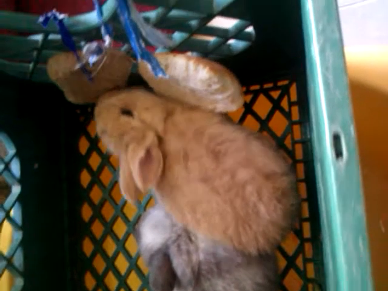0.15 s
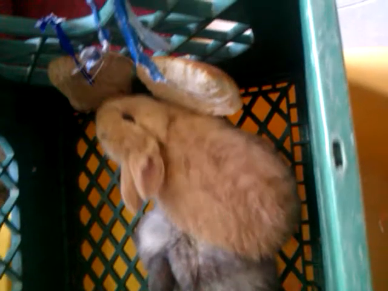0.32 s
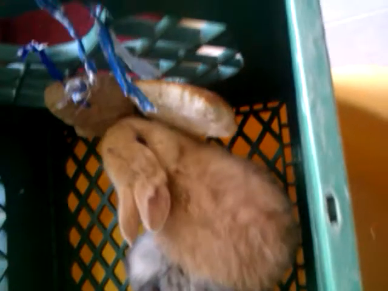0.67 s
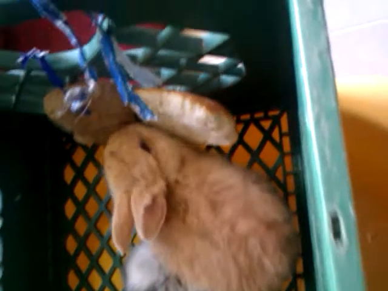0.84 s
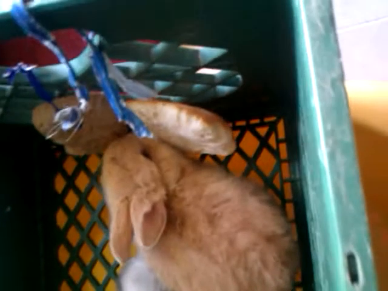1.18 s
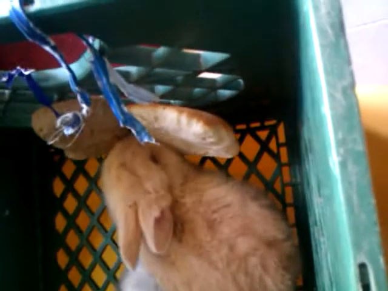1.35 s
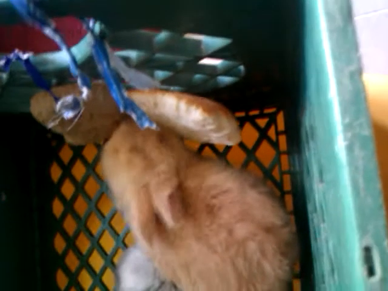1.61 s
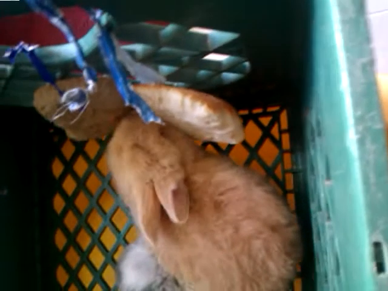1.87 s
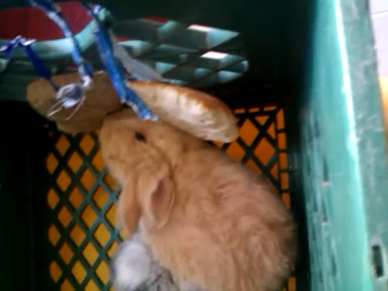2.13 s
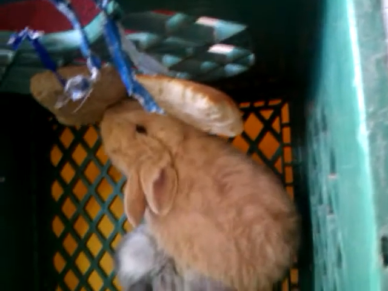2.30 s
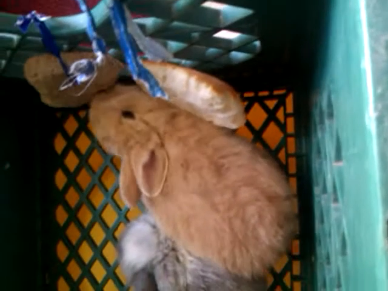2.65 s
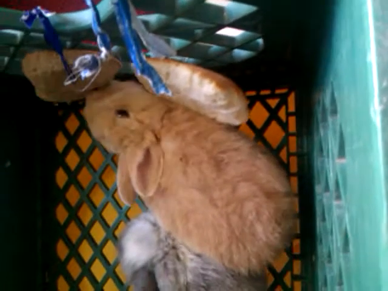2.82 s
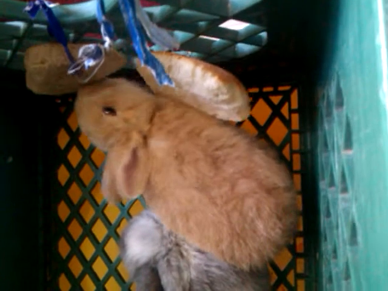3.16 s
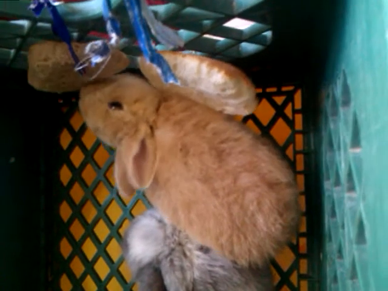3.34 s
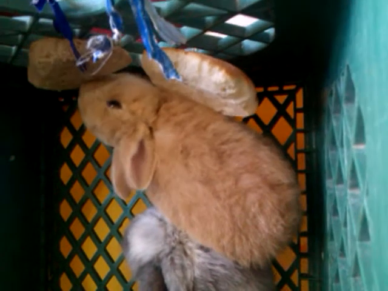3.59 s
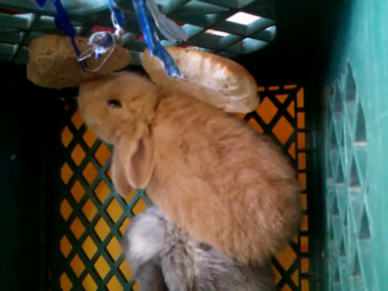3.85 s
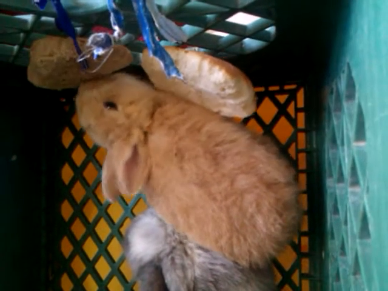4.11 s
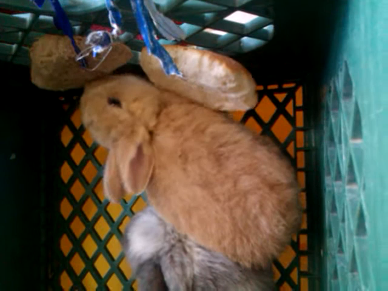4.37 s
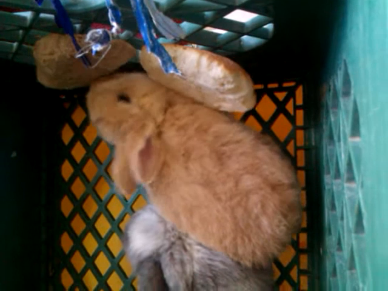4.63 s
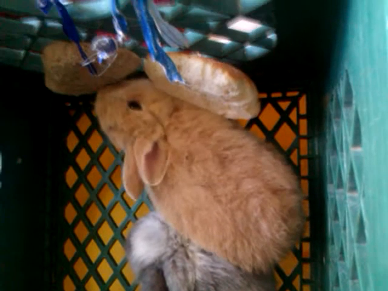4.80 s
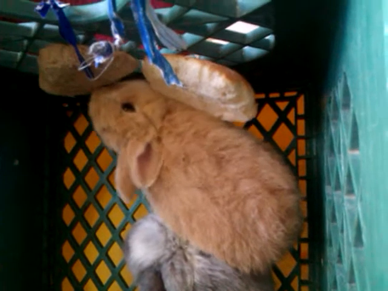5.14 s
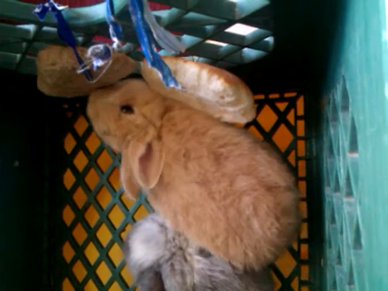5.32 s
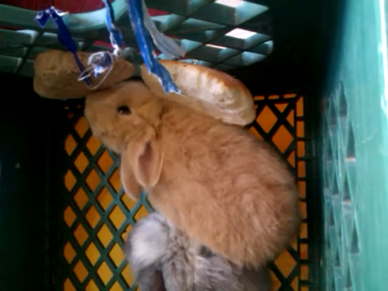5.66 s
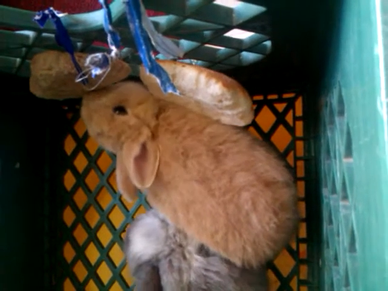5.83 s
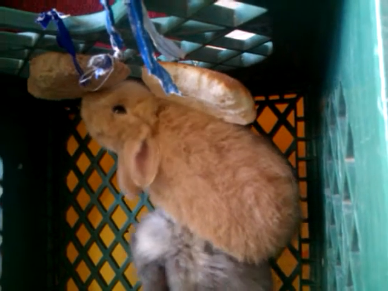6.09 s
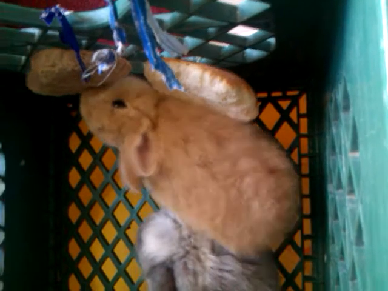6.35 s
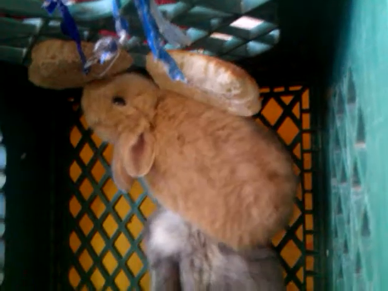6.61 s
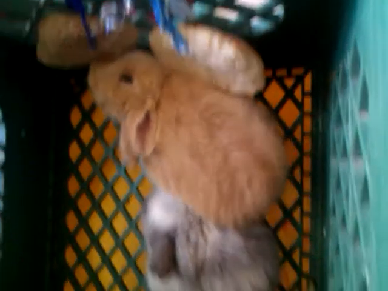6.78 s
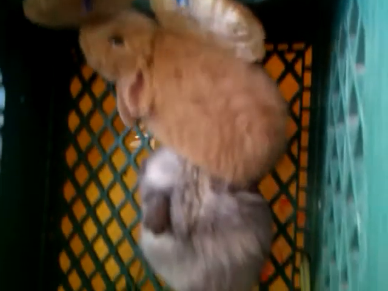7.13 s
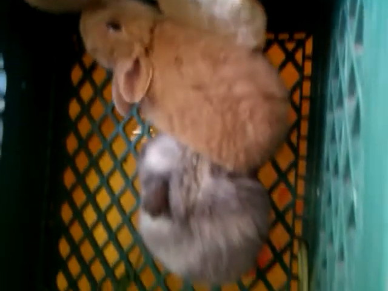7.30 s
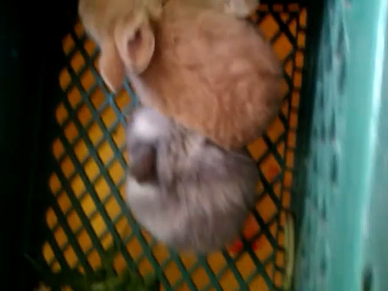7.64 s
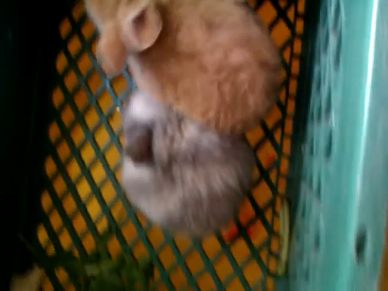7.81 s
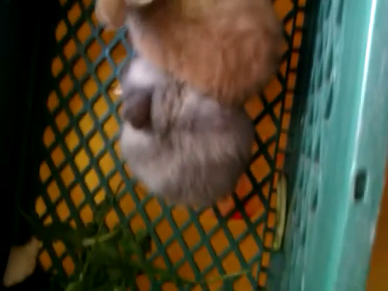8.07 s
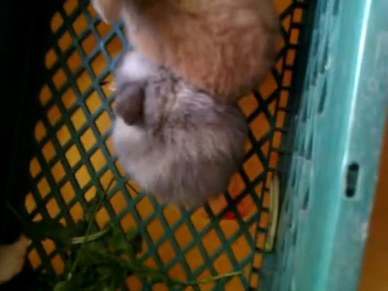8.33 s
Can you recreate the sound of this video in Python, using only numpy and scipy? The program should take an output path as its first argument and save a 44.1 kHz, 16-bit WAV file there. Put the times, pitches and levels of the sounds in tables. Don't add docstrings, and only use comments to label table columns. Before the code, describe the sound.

Sparse clicks and a distant metallic clank give way to dense crunching and scraping of hard bread, with hollow plastic knocks in a small room.

```python
import sys
import numpy as np
from scipy import signal
from scipy.fft import rfft, irfft
from scipy.io import wavfile
from scipy.ndimage import uniform_filter1d, map_coordinates

SR = 44100
rng = np.random.default_rng(int(sys.argv[2]) if len(sys.argv) > 2 else 0)


def to_linear_factor(level_db):
    exponent = np.asarray(level_db, float) / 20
    return 10 ** exponent


def wrap_up_sound(samples):
    columns = np.atleast_2d(samples).T
    tamed = np.clip(columns, -1, 1)
    steps = np.round(tamed * 32767).astype(np.int16)
    wavfile.write(sys.argv[1], SR, steps)


N = 373086


def unit(x):
    return x / np.sqrt(np.mean(x ** 2) + 1e-20)


def along(points, hz):
    f, v = np.transpose(points)
    return np.interp(np.log(hz + 1), np.log(f + 1), v)


def curves(rows):
    s, *cols = np.transpose(rows)
    return [np.interp(np.arange(N) / SR, s, c, -120, -120) for c in cols]


def wobble(rate):
    knots = rng.standard_normal(int(N * rate / SR) + 4)
    return map_coordinates(knots, [np.arange(N) * rate / SR])


def filtered(x, response):
    h = irfft(response(np.fft.rfftfreq(2 ** 15, 1 / SR)))
    return signal.oaconvolve(x, h / np.linalg.norm(h))[:len(x)]


def coloured(x, spectrum):
    def response(hz):
        c = irfft(np.log(to_linear_factor(along(spectrum, hz)) + 1e-6))
        c[1:len(c) // 2] *= 2
        c[len(c) // 2 + 1:] = 0
        return np.exp(rfft(c))
    return filtered(x, response)


def resonant(x, peaks):
    def response(f):
        total = 0
        for k, (c, w, db) in enumerate(peaks):
            total = total + (-1) ** k * to_linear_factor(db) * 1j * f * w / (c * c - f * f + 1j * f * w)
        return total
    return filtered(x, response)


def dulled(x, corner_hz):
    return filtered(x, lambda hz: 1 / (1 + 1j * hz / corner_hz) ** 4)


def bursts(times, levels_db, lives, rise=0.13):
    shape = np.zeros(N + SR)
    for s, db, life in zip(times, levels_db, lives):
        u = np.arange(round(8 * life * SR) + 2) / (SR * life)
        shape[round(s * SR):][:len(u)] += to_linear_factor(db - 9.84 * u) * (1 - np.exp(-u / rise))
    return shape[:N] * rng.standard_normal(N)


def blows(times, levels_db):
    return np.bincount(np.round(times * SR).astype(int), to_linear_factor(levels_db), N)


# pitch in Hz, time to fall 60 dB in seconds.
ROOM_DECAY = [(200, 0.41), (2000, 0.31), (6000, 0.34), (12000, 0.2)]


def room(x):
    out, step = np.zeros(N + 2 * SR), SR // 4
    for i in range(0, N, step):
        hz, t, z = signal.stft(rng.standard_normal(SR // 2), SR, nperseg=256)
        decay = to_linear_factor(-60 * t / along(ROOM_DECAY, hz)[:, None])
        tail = signal.istft(z * decay, SR, nperseg=256)[1]
        wet = signal.fftconvolve(x[i:i + step], tail / np.linalg.norm(tail))
        out[i:i + len(wet)] += wet
    return out[:N]


def lattice(x):
    low_hz, high_hz = 270, 4150
    return signal.sosfilt(signal.butter(4, [low_hz, high_hz], "band", fs=SR, output="sos"), x)


# pitch in Hz, level in dB per Hz.
AIR = [(53, -41), (90, -6.5), (145, -6), (273, -11.5), (370, -13.5), (711, -11), (865, -16.5), (1700, -17),
       (3190, -18.5), (4320, -18), (6830, -17.5), (11300, -24), (16300, -24.5)]
# pitch in Hz, level in dB per Hz.
HAND_RUMBLE = [(10, -32), (18, 7), (32, 6), (50, 2.5), (80, -3), (110, -15), (160, -34)]
# time in seconds, level in dB.
GRIP_SHIFTS = [(.12, -49.5), (.87, -58)]
# time in seconds, level in dB, pitch in Hz.
MOTOR = [(6.2, -101, 48.8), (6.66, -63, 48.7), (6.92, -67, 50), (7.1, -68, 49.1), (7.38, -65, 48.4),
         (7.54, -66, 48.4), (8.13, -59, 49.1), (8.46, -64, 49.2)]
# pitch in Hz, level in dB.
WHINE = [(11542, -87.5)]


def room_tone():
    t = np.arange(N) / SR
    air_db, rumble_db, shift_s = -60.5, -68.5, 0.075
    air = to_linear_factor(air_db + 0.83 * wobble(1.7)) * unit(coloured(rng.standard_normal(N), AIR))
    grip = sum(to_linear_factor(db) * np.exp(-((t - s) / shift_s) ** 2) for s, db in GRIP_SHIFTS)
    hand_level = grip + to_linear_factor(rumble_db + 2.0 * wobble(8.2))
    hand = hand_level * unit(coloured(rng.standard_normal(N), HAND_RUMBLE))
    motor_db, motor_hz = curves(MOTOR)
    motor_phase = 2 * np.pi * np.cumsum(motor_hz + 1.5 * wobble(5.7)) / SR
    motor = to_linear_factor(motor_db + 1.5 * wobble(8.3)) * np.sin(motor_phase)
    (whine_hz, whine_db), = WHINE
    whine = to_linear_factor(whine_db + 10.5) * np.sin(2 * np.pi * whine_hz * t)
    return air + hand + motor + whine


# pitch in Hz, level in dB per Hz.
BRIGHT = [(2470, -36.5), (4200, -11.5), (6180, -1.5), (9290, -17.5), (12400, -29.5), (15100, -26.5),
          (15800, -32), (16300, -43)]
# pitch in Hz, level in dB per Hz.
CRUNCH = [(700, -18), (1400, -8), (2000, -3.5), (2800, 0), (3600, -4), (4600, -8), (6000, -9), (9500, -70)]
# pitch in Hz, level in dB per Hz.
THUD = [(60, -56), (130, -17.5), (280, 3), (900, 5.5), (1500, -2.5), (2500, -53)]
# pitch in Hz, width in Hz, level in dB.
HOLLOW = [(291.3, 24, 6.5), (455, 74, -2)]
# pitch in Hz, width in Hz, level in dB.
WALLS = [(592.4, 31.6, 3.5), (898.6, 26, -1.5), (1485, 25, -8), (1638, 71, -7.5), (1914, 47, -5)]
# start in seconds, length in seconds, then rasp, crunch and crate hum in dB.
SCRAPES = [(1.063, 0.21, -65, -65, -85), (2.65, .04, -76, -63, -70), (2.272, 0.11, -62, -65, -61),
           (2.383, 0.071, -64, -72, -69), (2.435, 0.13, -63.5, -66, -61), (2.79, 0.11, -59, -80, -84),
           (3, 0.098, -47.5, -48, -44), (6.364, 0.028, -53.5, -67, -57), (6.675, 0.095, -58, -64, -84),
           (6.8, 0.056, -55, -57, -57.5), (7.037, 0.17, -51, -57, -43.5), (7.496, 0.027, -60, -48.5, -59),
           (0.185, 0.42, -71, -64.5, -62), (.98, 0.55, -68, -67.5, -75), (1.417, 0.28, -70, -66.5, -67),
           (2.912, 0.082, -67, -59.5, -58), (3.434, 0.14, -80, -82, -50.5), (3.928, 0.26, -69, -78, -46.5),
           (5.678, 0.096, -52.5, -54, -50), (5.983, 0.13, -56, -53, -56), (6.203, 0.27, -69, -71, -58.5),
           (6.53, 0.13, -69, -71, -66), (6.817, 0.5, -70, -68, -71), (7.393, 0.28, -62.5, -57.5, -51),
           (8.374, 0.063, -62, -72, -89), (0, 0.054, -48, -56, -60), (5.13, 0.13, -54.5, -52.5, -70),
           (5.004, .045, -54, -43.5, -48)]
# time in seconds, pressure in dB.
DRAGS = [
    [(3.522, -90), (3.575, -42), (3.632, -40), (3.69, -42), (3.76, -53.5), (3.89, -85)],
    [(4.2, -64.5), (4.27, -43.5), (4.345, -34.5), (4.41, -35.5), (4.46, -38.5), (4.53, -42), (4.58, -60)],
    [(4.5, -72), (4.56, -37), (4.61, -36), (4.7, -38.5), (4.76, -31), (4.82, -36), (4.93, -41.5),
     (4.99, -44.5), (5.04, -60)],
    [(4.97, -62), (5.03, -44.5), (5.11, -40), (5.2, -40), (5.33, -45.5), (5.48, -44), (5.608, -48.5),
     (5.69, -70)],
]
# rasp, crunch and crate hum, all in dB over the pressure.
DRAG_SHARES = [(0, -2.5, -9), (0, -6.5, -18), (0, -5.5, -18), (0, -6, -19)]
# rasp, crunch and crate hum in dB.
FIDGET = (-72, -72.5, -79)


def rasp():
    gains = to_linear_factor(np.array(FIDGET)[:, None] + 1.03 * wobble(2.9))
    for drag, shares_db in zip(DRAGS, DRAG_SHARES):
        gains += to_linear_factor(curves(drag)[0] + np.array(shares_db)[:, None])
    for s, length, *levels_db in SCRAPES:
        swell = np.sqrt(np.sin(np.linspace(0, np.pi, round(length * SR))).clip(0))
        gains[:, round(s * SR):][:, :len(swell)] += to_linear_factor(np.array(levels_db))[:, None] * swell
    stroke_db = 0.78 * wobble(18)

    def grains():
        return rng.standard_normal(N) * to_linear_factor(stroke_db + 1.5 * wobble(900) + 1.6 * wobble(120))

    bright = unit(coloured(grains(), BRIGHT))
    crunch = unit(coloured(grains(), CRUNCH))
    hum = unit(resonant(grains(), HOLLOW + WALLS) + 0.7 * coloured(grains(), THUD))
    return gains[0] * bright + gains[1] * crunch + gains[2] * lattice(hum)


# time in seconds, peak in dB, hardness in dB, contact in seconds.
TAPS = [(.796, -41, -1, 0.0073), (3.039, -36, 5.5, 0.037), (3.325, -41.5, -8, 0.017),
        (4.004, -27, 2.5, 0.015), (4.043, -24.5, 6, 0.0051), (4.114, -26, 0, 0.012),
        (4.756, -20, 0, 0.0086), (5.15, -39, 3, 0.022), (5.373, -18.5, 0.5, 0.0116),
        (5.447, -31.5, 2, 0.017), (6.012, -18, -5, 0.015), (7.06, -35, -3, 0.032),
        (7.136, -21.5, -5, 0.008)]
BANGS = [(.001, -33.5, -2, 0.016), (.023, -33.5, 2, 0.015), (2.488, -40, -11, 0.014),
         (2.733, -51, 3.5, 0.023), (2.786, -47, -1, 0.012), (2.893, -35, -5, 0.011),
         (3.007, -27, -12, 0.014), (3.022, -36, -12, 0.01), (3.031, -40.5, -12, 0.01),
         (3.081, -32.5, -10, 0.0099), (3.348, -37, -6, 0.012), (3.445, -21.5, 4.5, 0.012),
         (3.561, -35.5, -8, 0.011), (3.884, -23, -1.5, 0.012), (3.969, -30, -0.5, 0.011),
         (4.062, -28.5, -13, 0.015), (4.979, -30.5, -33, 0.012), (5, -25, -1, 0.011),
         (5.253, -32, -12, 0.012), (5.492, -24.5, -7, 0.015), (5.706, -39.5, -25, 0.016),
         (5.73, -41.5, -25, 0.0154), (5.93, -53, -25, 0.016), (5.9, -41, -14, 0.023),
         (5.986, -46, -10, 0.007), (7.159, -32.5, 0, 0.0125), (7.417, -48, -1, 0.0085)]
PAWS = [
    (3.759, -46, -2, 0.0035),
    (4.243, -47.5, 4, 0.016),
    (6.258, -42, 1, 0.029),
    (6.38, -38.5, -19, 0.0143),
    (6.419, -46, -1, 0.0087),
    (6.826, -39.5, -11, 0.016),
    (7.095, -41, -19, 0.013),
]
JOLTS = [
    (0.083, -36, 3, 0.013),
    (.125, -46, -6, 0.011),
    (0.379, -41, -17, 0.017),
    (0.643, -45, -5, 0.014),
    (.794, -34.5, -8, 0.013),
    (.822, -41, -10, 0.0094),
]
FLICKS = [
    (7.484, -44, -13, 0.0065),
    (7.515, -48, -4, 0.012),
    (7.561, -34, 0, 0.015),
    (7.678, -32.5, -2, 0.0073),
    (7.704, -37.5, -30, 0.0107),
]
# walls, slap, hollow, shelf and thump, all in dB.
STIRS = [
    (-3.5, -2, -13.5, -30.5, -29),
    (0.5, -0.5, -4, -23.5, -30),
    (1, 1, 1.5, -17.5, -21),
    (-4, 4, -10.5, -13, 3.5),
    (6, -7.5, -11.5, -19.5, -30),
]
# pitch in Hz, width in Hz, level in dB.
SHELF = [(154.4, 10.6, 0), (271, 10.4, -4)]
# pitch in Hz, level in dB per Hz.
KNOCK = [(700, -15.5), (1400, -3), (2000, 0), (2800, 0), (3500, -4.5), (4300, -20), (6000, -38),
         (9500, -76)]
# pitch in Hz, level in dB per Hz.
THUMP = [(60, -27), (110, -2), (200, -1), (330, 4.5), (480, -11.5), (900, -38)]


def knocks():
    kinds = [TAPS, BANGS, PAWS, JOLTS, FLICKS]
    s, db, hard_db, contact = np.vstack(kinds).T
    wall_db, slap_db, hollow_db, boom_db, thump_db = np.repeat(STIRS, [len(k) for k in kinds], axis=0).T
    boom_db = boom_db - 0.57 * (db + 37.5)
    place_db = 2.9 * rng.standard_normal((len(s), len(WALLS)))
    soft = 0.19
    strike_db = 20.5

    def blow(gain_db, life):
        return bursts(s, gain_db, life, soft) + blows(s + 0.1513 * contact, gain_db + strike_db)

    walls = 0
    for k, (hz, width, level) in enumerate(WALLS):
        tilt_db = wall_db.clip(0) * np.log2(hz / 600)
        mode_db = db + wall_db + level - 13.5 + place_db[:, k] - tilt_db
        walls = walls + resonant(blow(mode_db, contact), [(hz, 0.86 * width, 0)])
    hollow = resonant(blow(db + hollow_db - 4.0, 2.52 * contact), HOLLOW)
    boom = resonant(bursts(s, db + boom_db + 1.5, 2.9 * contact, soft), SHELF)
    slap = coloured(bursts(s, db + slap_db - 5, 1.1 * contact, soft), THUD)
    crack = coloured(bursts(s, db + hard_db - 2.5, 0.58 * contact, soft), KNOCK)
    thump = coloured(bursts(s, db + thump_db - 4.5, 2.94 * contact, soft), THUMP)
    return lattice(walls + hollow + slap) + boom + thump + crack


# time in
# seconds, peak in dB.
TICKS = [(.0295, -32), (0.041, -28.5), (0.055, -12.5), (.0598, -26), (.0652, -23), (3.0015, -39),
         (3.024, -33), (6.225, -35), (2.7319, -36), (3.0385, -25.5), (3.4446, -22), (3.5523, -24),
         (4.0045, -16), (4.0439, -11.5), (4.0654, -7.5), (4.357, -23), (4.3956, -25), (4.6023, -30),
         (4.7356, -15), (5.832, -39), (5.025, -17), (5.1412, -26), (5.4468, -23.5), (5.7306, -26),
         (5.938, -37), (5.966, -33), (5.928, -47), (7.128, -29), (7.173, -29), (4.2492, -38), (4.2707, -32),
         (4.9791, -38), (5.9817, -28), (6.0111, -4.5), (6.331, -33.5), (6.3657, -34), (6.379, -27),
         (6.418, -31), (6.8224, -31.5), (6.8473, -33), (7.0062, -38), (7.0786, -25), (7.1444, -18.5)]
# time in seconds, peak in dB.
CRACKS = [(0.02, -24), (7.497, -39), (7.52, -41), (2.9416, -39), (2.978, -43), (3.0078, -17), (3.054, -24),
          (3.078, -24.5), (3.112, -31.5), (3.5344, -31), (3.5819, -23), (3.941, -40), (3.9678, -24),
          (3.989, -20), (4.0214, -28), (4.1128, -10.5), (4.382, -26), (4.561, -25), (4.752, -20),
          (4.9994, -20.5), (5.3734, -38), (5.482, -21.5), (6.342, -37), (6.802, -37), (7.0925, -25),
          (7.109, -35), (7.1323, -15), (7.1642, -22), (7.459, -39), (7.5817, -31.5), (8.373, -37),
          (8.3833, -32.5)]
# pitch in Hz, width in Hz.
PORT = (6450, 560)
# pitch in Hz, level in dB per Hz.
SHOCK = [(500, -57), (2470, -19), (4200, -18), (5610, -16), (6500, -6), (7450, -20.5), (9800, -26.5),
         (16300, -52.5)]


def snaps():
    s, db = np.transpose(TICKS + CRACKS)
    same = np.ones(len(s))
    tick_crumble_db, crack_crumble_db = -14, -7.5
    crumble_db = np.repeat([tick_crumble_db, crack_crumble_db], [len(TICKS), len(CRACKS)])
    crumble_db = crumble_db - 0.067 * (db + 31)
    shock = blows(s, db + 17.0)
    for lag_s in (.0006, .0014):
        shock = shock + blows(s + lag_s, db + 10.5 + 2 * rng.standard_normal(len(s)))
    port_hz, port_width = PORT
    ping = resonant(resonant(shock, [(port_hz, port_width, 0)]), [(port_hz, 4 * port_width, 0)])
    ping = dulled(ping, 7000)
    snap = bursts(s, db - 3.5, 0.00117 * same, rise=0.63)
    after_rattle = dulled(bursts(s, db - 17.5, 0.0066 * same), 9000)
    edge = coloured(snap + after_rattle, SHOCK)
    crumble = coloured(bursts(s, db + crumble_db - 5.0, 0.0054 * same, rise=0.12), CRUNCH)
    return to_linear_factor(-15.5) * ping, edge + crumble


# time in seconds, peak in dB.
SPLINTERS = [(0.0204, -55), (0.0384, -47), (0.0534, -44), (3.0081, -40), (3.0384, -48), (3.0534, -59),
             (3.0755, -60), (3.9679, -51), (3.9878, -42), (4.0038, -45), (4.0453, -44), (4.0642, -40),
             (4.1116, -46), (4.7354, -42), (4.7514, -43), (4.9994, -52), (5.445, -54), (5.9813, -56),
             (6.0112, -48), (7.0778, -55), (7.0918, -50), (7.1084, -43), (7.1317, -30), (7.1434, -40),
             (7.1634, -51)]
# pitch in Hz, level in dB per Hz.
SPLINTER_TOP = [(7000, -42), (10000, 3.5), (12500, -7), (15500, 10), (16400, -10)]


def splinters():
    s, db = np.transpose(SPLINTERS)
    life_s = 0.0044
    return coloured(bursts(s, db - 5.5, np.full(len(s), life_s), rise=0.2), SPLINTER_TOP)


# time in seconds, peak in dB, thud and hiss in dB over it, rattle in seconds.
CLACKS = [
    (0.055, -35, -2, 17.5, 0.012),
    (0.0614, -37.5, -30, 4.5, 0.054),
    (0.6655, -43.5, -9, 0.5, 0.035),
    (0.791, -36.5, 0, 5.5, 0.031),
    (2.3874, -58.5, -24, 11.5, 0.017),
    (6.2245, -36.5, -12, 3.5, 0.017),
]


def clacks():
    s, db, thud_db, hiss_db, rattle = np.transpose(CLACKS)
    body = coloured(bursts(s, db - 7.5, rattle), CRUNCH)
    thud = coloured(bursts(s, db + thud_db - 0.5, rattle), THUD)
    port_ring = resonant(bursts(s, db + hiss_db - 7.0, rattle), [(*PORT, 0)])
    hiss = coloured(bursts(s, db + hiss_db - 7, rattle), BRIGHT)
    return body + thud + port_ring + hiss


# start in seconds, length in seconds, level in dB.
NUDGE = (1.03, 0.28, -62)
# time in seconds, peak in dB, thud and ring in dB over it, rattle in seconds.
LANDING = [
    (1.708, -33, -10, -16, 0.07),
    (1.714, -32, 2.5, -17, 0.012),
    (1.9134, -9, -19.5, -17, 0.015),
    (1.927, -16.5, -14.5, -8, 0.012),
    (1.9389, -15, -30, -3, 0.012),
    (1.9508, -17.5, -38, 7, 0.0085),
]
# pitch in Hz, level in dB, time to fall 60 dB in seconds.
DISH_MODES = [(883, -16, .36), (2250, -13, .26), (2320, -14, .3), (2643, -11, .23), (3095, -8, .13),
              (4204, -15, .21), (4506, -9, .26), (5706, 1, .18), (6180, -16, .3), (6611, -18, .25),
              (7187, -14, .24), (7522, -14, .2), (8603, -19, .2), (9017, -22, .2)]
# pitch in Hz, level in dB per Hz.
CLATTER = [(590, -24.5), (1000, -10.5), (2690, -4.5), (3240, -10), (5450, -10.5), (5860, -6), (8880, -23),
           (9350, -20), (9950, -90), (12000, -103.5), (15600, -128), (22000, -120)]
# pitch in Hz, width in Hz, level in dB.
COUNTER = [(326, 42, 3), (703, 35, 0), (855, 66, 1), (1210, 26, -10), (1440, 27, -12)]
# pitch in Hz, level in dB per Hz.
BOARDS = [(35, -37), (70, -6), (150, 5), (260, 4), (500, -38)]


def dish():
    s, db, thud_db, ring_db, rattle = np.transpose(LANDING)
    metal = [(hz, np.log(1000) / (np.pi * t60), level) for hz, level, t60 in DISH_MODES]
    start, length, slide_db = NUDGE
    stroke = np.sin(np.pi * ((np.arange(N) / SR - start) / length).clip(0, 1))
    slide = stroke * rng.standard_normal(N)
    held = [(hz, 4 * width, level) for hz, width, level in metal]
    strike = blows(s, db + ring_db + 11.5) + bursts(s, db + ring_db - 21, 1.5 * rattle)
    ring = resonant(strike, metal) + to_linear_factor(slide_db) * resonant(slide, held)
    clatter = coloured(bursts(s, db - 9.0, rattle), CLATTER)
    thud = coloured(bursts(s, db + thud_db - 7.5, rattle), THUD)
    counter = resonant(bursts(s, db + thud_db - 3.0, rattle), COUNTER)
    boards = coloured(bursts(s, db + thud_db - 11, 1.55 * rattle, rise=0.26), BOARDS)
    return clatter + thud + counter + boards, dulled(ring, 9500)


# start in seconds,
# length in seconds, pitch in Hz, level in dB.
SQUEAKS = [
    (1.15, .1, 5600, -77),
    (2.381, 0.057, 5100, -52),
    (2.812, 0.06, 5670, -58),
]


def squeaks():
    x, flutter = np.zeros(N), to_linear_factor(2.1 * wobble(60))
    width_hz = 540
    for s, length, hz, db in SQUEAKS:
        band, n = [(hz, width_hz, 0)], round(length * SR)
        hiss = unit(resonant(resonant(rng.standard_normal(SR // 4), band), band))[:n]
        swell = np.sin(np.linspace(0, 3.14, n)) ** .6
        x[round(s * SR):][:n] += to_linear_factor(db) * swell * hiss
    return x * flutter


# time in seconds, peak in dB.
RIM_HITS = [
    [(3.446, -44), (3.886, -37), (4.045, -48), (4.114, -28), (5.374, -42), (6.013, -34)],
    [(3.895, -38), (7.484, -44), (7.5, -44), (7.563, -39), (7.679, -37), (5.374, -36)],
]
# pitch in Hz, width in Hz.
RIM_NOTES = [(1466, 37), (905, 21)]


def rims():
    song = 0
    for hits, note in zip(RIM_HITS, RIM_NOTES):
        s, db = np.transpose(hits)
        song = song + resonant(bursts(s, db + 1.5, np.full(len(s), 0.009)), [(*note, 0)])
    return song


def scene():
    tone = room_tone()
    near = rasp() + knocks() + squeaks() + rims()
    ping, crust = snaps()
    landing, ring = dish()
    far = clacks() + landing
    direct = ping + splinters() + crust + near + ring + far
    into_room = to_linear_factor(-13.5) * crust + to_linear_factor(-12.0) * near + to_linear_factor(-7.0) * ring + far
    return (direct + room(into_room) + tone)[None]


def top_cut(x):
    return signal.sosfilt(signal.butter(12, 16660, fs=SR, output="sos"), x)


def record(dry):
    kept = signal.sosfilt(signal.cheby2(10, 50, 16500, fs=SR, output="sos"), dry)
    treble = signal.sosfiltfilt(signal.butter(10, 9400, "high", fs=SR, output="sos"), kept)

    def power(x):
        return abs(uniform_filter1d(x ** 2, size=1024))

    masked = power(treble) < to_linear_factor(-29) ** 2 * power(kept)
    kept = kept - treble * uniform_filter1d(1. * masked, size=256)
    return top_cut(kept)


dry = scene()
out = record(dry)
wrap_up_sound(out)
```